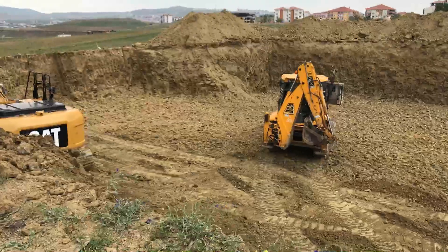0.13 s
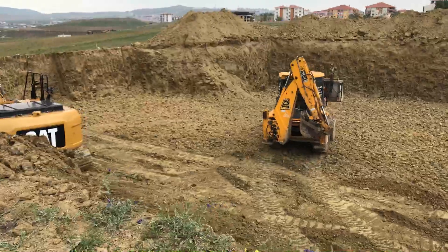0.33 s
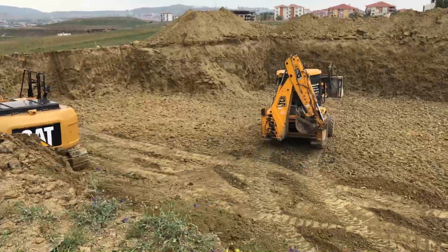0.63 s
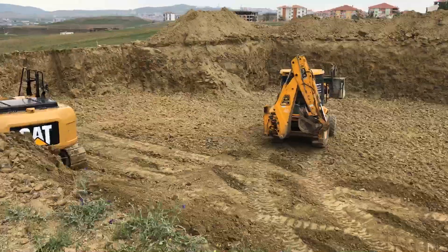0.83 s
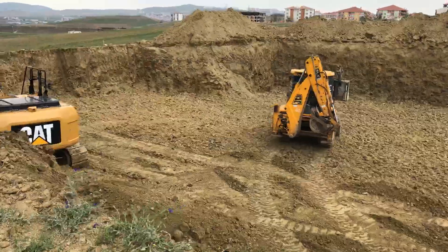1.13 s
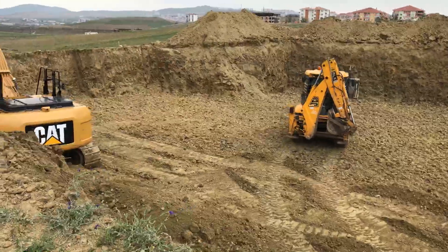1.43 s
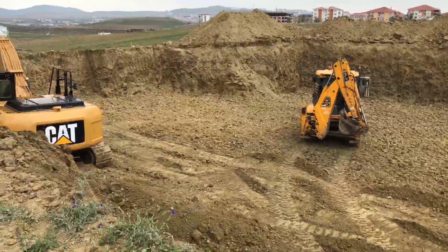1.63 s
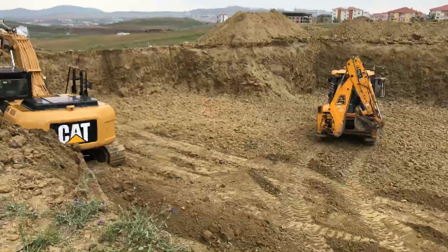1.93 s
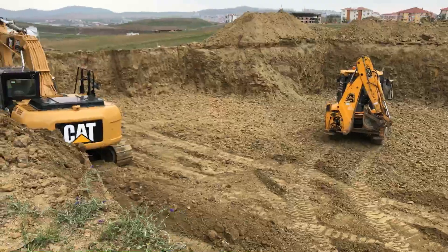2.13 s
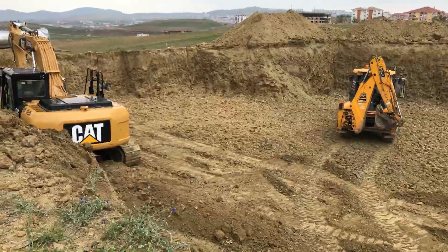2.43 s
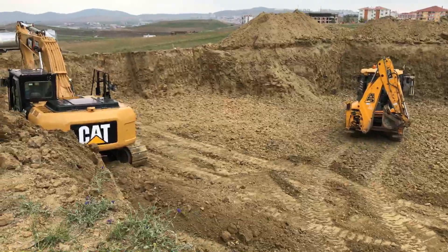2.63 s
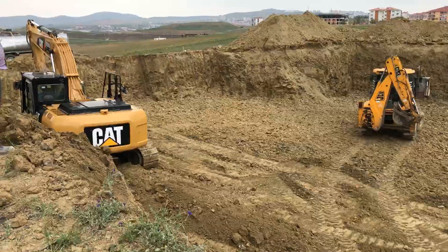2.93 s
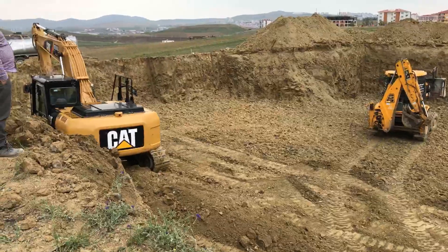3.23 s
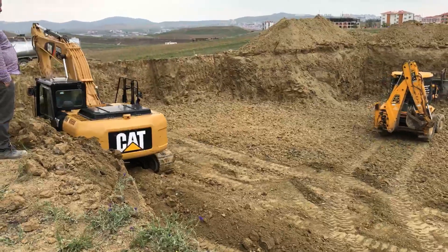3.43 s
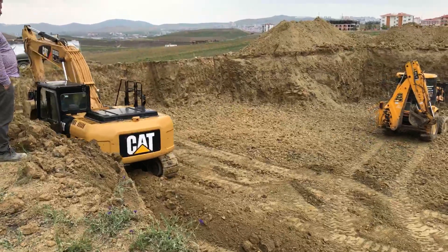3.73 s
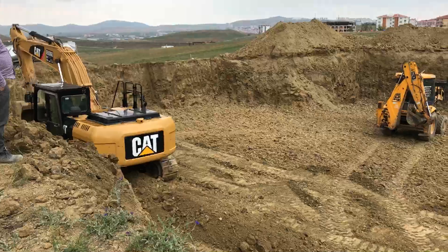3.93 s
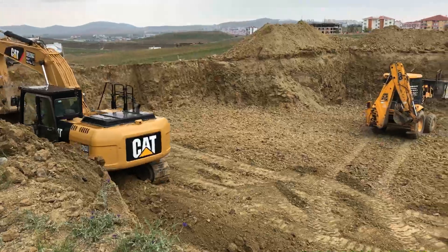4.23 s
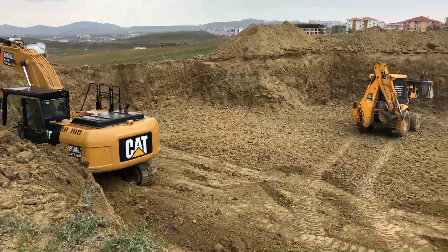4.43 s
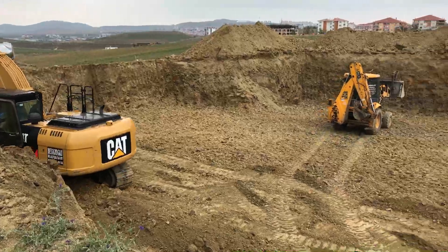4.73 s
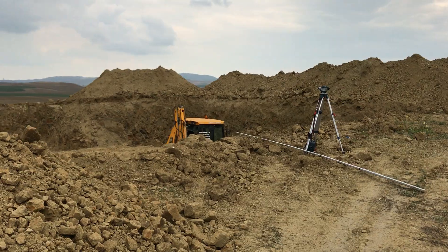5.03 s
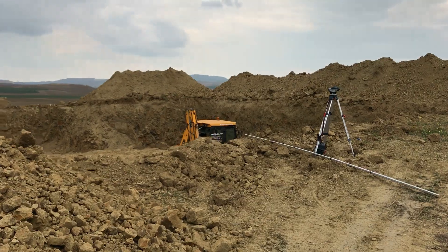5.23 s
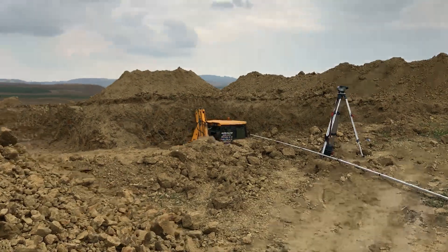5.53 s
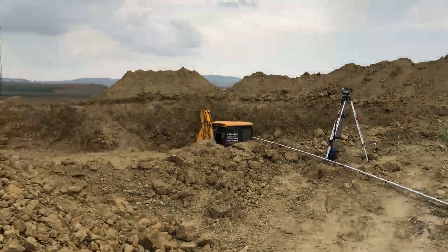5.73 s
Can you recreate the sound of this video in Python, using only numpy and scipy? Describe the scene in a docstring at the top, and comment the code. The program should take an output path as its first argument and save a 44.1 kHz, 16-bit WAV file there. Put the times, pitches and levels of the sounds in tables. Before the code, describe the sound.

From the start, a loader's diesel drones low and slightly unevenly, with rough knocking and a very faint, high wavering turbo whistle. A tracked excavator crawls over dirt: gritty grinding, hollow low booms, short dry squeaks and faint hydraulic hiss. Steel clanks and scrapes come irregularly, with a sharp one near 0.8 s and scattered single knocks through 1 to 2.3 s. The engine sags and its drone swells around 2 to 2.7 s. The densest, loudest clatter falls at about 2.8 to 3.2 s, followed by more blows near 3.4 and 3.8 s and crunching scrapes until 5 s. Soft wind gusts nudge the outdoor microphone. At about 5.05 s the sound stops abruptly; silence lasts until 5.6 s. Then the site returns from further back: muffled drone, dull noise, quick low bumps near 5.6 and 5.85 s, and a faint clatter around 5.7 s.

```python
"""The diesel of a backhoe loader pushing soil in a pit drones in firing orders, knocks as gated noise and
whistles from its turbo. A tracked excavator crawls below the rim: bursts of contacts, coloured by the steel,
clank and scrape; grains grind, pins squeak in noisy modes, hulls boom, a valve hisses, and wind turbulence
nudges the microphone. After half a second of silence the site is heard from further back, hidden by the rim:
a shaded drone over a dull noise bed, one distant clatter and soft low bumps."""
import sys
import numpy as np
from scipy import signal
from scipy.fft import rfft, irfft
from scipy.io import wavfile
from scipy.ndimage import uniform_filter1d, map_coordinates

SR = 44100
rng = np.random.default_rng(int(sys.argv[2]) if len(sys.argv) > 2 else 0)


def bounce(signal):
    """Save signal as a 16-bit WAV file at the path given by the first command-line argument."""
    frames = np.transpose(np.atleast_2d(signal))
    limited = np.clip(frames, -1, 1)
    pcm = np.round(limited * 32767).astype(np.int16)
    wavfile.write(sys.argv[1], SR, pcm)


N = 258867
T = np.arange(N) / SR
HZ = np.fft.rfftfreq(N, 1 / SR)

# Spectra give only a shape: their sounds are scaled to rms 1 before a level is set.
# spectrum of wind turbulence: frequency_hz, density_db (per Hz)
WIND_SPECTRUM = [(15, -44), (28, -17), (45, 3), (62, 4.5), (85, 3), (130, -8), (250, -31), (600, -58.5)]
# gusts on the microphone: peak_s, level_db, half_length_s
WIND_GUSTS = [(0.514, -30.5, 0.047), (0.657, -38.5, 0.034), (1.032, -39, .025), (1.54, -32, 0.015),
              (1.98, -25.5, 0.038), (2.393, -33, 0.14), (3.046, -31.5, 0.098), (3.28, -25, 0.068),
              (3.6, -32.5, 0.089), (3.9, -27, 0.088), (4.136, -28, 0.031), (4.395, -34, 0.055),
              (4.654, -32, 0.058), (5.8, -29.5, 0.048)]
# spectrum behind the rim: frequency_hz, density_db (per Hz)
FAR_SPECTRUM = [(50, -23), (100, -10.5), (165, -2.5), (230, -17), (400, -19.5), (800, -20.5), (1500, -26.5),
                (3000, -33.5), (6000, -38.5), (9000, -48), (12500, -47), (15500, -64)]
# soft low bumps: peak_s, level_db, pitch_hz, half_length_s
SOFT_BUMPS = [(5.608, -23.5, 80, 0.015), (5.639, -12, 96, 0.0033), (5.636, -19, 224, 0.0022),
              (5.854, -21.5, 142, 0.0061)]
# brief narrow tones: steel parts, and at 2.46 s the engine's ninth firing order:
# peak_s, pitch_hz, level_db, half_length_s
BRIEF_TONES = [(0.01, 765, -31, 0.018), (0.947, 767, -33.5, 0.028), (1.056, 775, -36, 0.018),
               (2.46, 717, -42, 0.15), (4.504, 4490, -45, 0.018), (4.495, 5320, -44, .008),
               (5.772, 2040, -40.5, 0.0035)]
# hydraulic valve openings: start_s, length_s, level_db
OPENINGS = [(-.1, 0.54, -56), (.88, .22, -57), (1.65, 0.426, -55), (2.497, 0.37, -53.5)]
# squeaks of dry track pins: start_s, level_db, length_s (four times the time to the peak)
PIN_SQUEAKS = [(0, -38.5, .13), (.36, -49, .1), (0.68, -43, .14), (1.33, -52, .07), (2.1, -42, .09),
               (2.61, -57.5, .06), (3.164, -54, .06), (3.55, -43.5, .09), (4.54, -51, .1),
               (4.986, -49, .07)]
# modes of a squeaking pin: frequency_hz, width_hz, level_db
PIN_MODES = [(4500, 140, -14.5), (8830, 1400, -8), (12010, 180, -3.5), (13070, 200, -17)]
# spectrum of the booming hulls: frequency_hz, density_db (per Hz)
HULL_SPECTRUM = [(50, -24), (100, -10.5), (140, 2.5), (190, 0.5), (260, 2), (345, -3), (410, -12.5),
                 (600, -44), (1500, -49.5)]
# boom of the hulls with the crawling: time_s, level_db
HULL_LEVEL = [(0, -34.5), (.75, -35), (1.5, -38), (2.3, -38.5), (2.9, -33), (3.5, -35), (4.3, -37),
              (4.75, -34.5), (5.05, -36.5)]
# spectrum of crushed soil: frequency_hz, density_db (per Hz)
SOIL_SPECTRUM = [(250, -33), (440, -7), (570, 8), (730, 8), (950, -3), (1300, 1.5), (1650, -1.5),
                 (2100, -9), (3500, -12.5), (8000, -56)]
# soil grinding under the tracks: time_s, level_db
SOIL_LEVEL = [(0, -42.5), (.75, -44.5), (1.15, -45), (2.5, -45), (2.8, -37.5), (3.6, -37), (4.15, -37.5),
              (4.6, -35), (5.05, -39)]
# spectrum of rubbing grit: frequency_hz, density_db (per Hz)
GRIT_SPECTRUM = [(700, -24), (1600, -4), (2300, -1.5), (3200, 0), (4100, -4.5), (4500, -2.5), (5000, -10),
                 (6500, -12.5), (7800, -15.5), (9000, -13), (10400, -19), (11800, -17.5), (13500, -21.5),
                 (16000, -25)]
# gritty hiss along the shoes: time_s, level_db (before GRIT_TRIM_DB)
GRIT_LEVEL = [(0, -41), (.5, -44.5), (1.35, -42.5), (2.45, -47), (2.95, -41), (3.9, -45.5), (4.4, -43),
              (5.05, -42)]
# spectrum of the undercarriage steel: frequency_hz, density_db (per Hz)
STEEL_SPECTRUM = [(100, -10), (280, 9.5), (430, 10.5), (700, 10.5), (950, 7), (1450, 4), (1950, -1.5),
                  (3200, -3.5), (4500, -10), (6500, -12), (8500, -16), (10500, -20.5), (12000, -18.5),
                  (16000, -28)]
# resonances and dips of the track shoes: frequency_hz, width_hz, gain_db (negative for a dip)
SHOE_PEAKS_AND_DIPS = [(744, 26, 3), (2370, 23, -0.5), (3390, 53, -0.5), (4490, 100, 9.5), (4800, 35, -7.5),
                       (5240, 50, 5.5), (8280, 60, 3), (8200, 70, 6.5), (9390, 60, 3), (9130, 68, 13)]
# track clanks: start_s, level_db, centre_hz, t60_s
TRACK_CLANKS = [(0.073, -28, 2400, .15), (0.452, -27.5, 1180, .12), (0.587, -36, 900, 0.45),
                (0.79, -22.5, 1470, 0.089), (1.032, -33, 1830, 0.14), (1.276, -28.5, 1500, .17),
                (1.691, -26.5, 1500, .12), (2.197, -36, 1200, .1), (2.292, -32, 1200, .1),
                (2.582, -29, 1220, .14), (2.759, -26, 1583, .12), (2.819, -31, 1092, 0.47),
                (2.997, -24.5, 1025, 0.14), (3.009, -20, 1103, 0.15), (3.042, -27, 800, .2),
                (3.062, -20.5, 4150, .08), (3.107, -32.5, 1100, .1), (3.418, -23, 1680, 0.14),
                (3.488, -26.5, 1505, .15), (3.779, -28, 1685, .1), (4.494, -35, 6020, .07),
                (4.632, -37, 1100, .1), (4.79, -29, 2210, 0.15), (4.931, -33, 1300, .2)]
# tracks scraping over stones: peak_s, level_db, centre_hz, half_length_s
TRACK_SCRAPES = [(-0.013, -29.5, 3400, 0.059), (0.663, -36, 1500, 0.059), (0.705, -27.5, 4500, 0.018),
                 (0.77, -32, 3220, 0.032), (0.949, -36, 2800, 0.011), (3.065, -31, 1208, 0.031),
                 (3.229, -29, 1244, 0.023), (3.55, -39, 3700, 0.064), (3.846, -34, 3220, 0.041),
                 (4.557, -32.5, 2460, 0.037), (4.678, -33.5, 2740, 0.035), (4.83, -34.5, 2300, 0.028)]
# turbocharger whistle, before jitter: time_s, pitch_hz
TURBO_PITCH = [(0, 12500), (1.2, 12200), (1.7, 11940), (2.05, 11800), (2.35, 12400), (2.65, 13000),
               (3, 12620), (3.5, 12500), (4.2, 12370), (5.05, 11950)]
# spectrum of combustion knock: frequency_hz, density_db (per Hz)
KNOCK_SPECTRUM = [(300, -6.5), (700, 3), (1000, 1.5), (1400, -2.5), (2100, -8.5), (3100, -24.5),
                  (5100, -13.5), (6000, -11.5), (7500, -19), (10400, -33), (11400, -19), (12500, -22),
                  (14000, -30.5), (16000, -32)]
# loader engine, before small speed changes: time_s, firing_rate_hz
FIRING_RATE = [(0, 82), (.2, 83), (.45, 88.5), (1, 85.5), (1.4, 85), (2.05, 78.3), (2.45, 79.7),
               (2.75, 83.5), (3.1, 85.5), (3.4, 84.5), (3.7, 87.5), (4.1, 88.5), (4.45, 93), (4.85, 81),
               (5.05, 80)]
# exhaust orders: multiple of the firing rate, level_db (on the drone level or the overtone level)
EXHAUST_ORDERS = [(1, 0), (2, -7), (2.5, -16), (3, -12), (3.5, -20), (4, -11.5)]
# exhaust line at the firing rate: time_s, level_db
DRONE_LEVEL = [(0, -34.5), (.45, -37.5), (1.4, -35), (2.3, -29.5), (2.65, -26.5), (3, -35.5), (4.1, -30.5),
               (4.5, -35), (5, -28), (5.87, -31)]

SILENCE_START_S, SILENCE_END_S, FADE_S = 5.052, 5.605, .002
BREEZE_DB, BREEZE_SWING_DB = -41.5, 4
VALVE_LEAK_DB, VALVE_RAMP_S = -63, 0.06
HULL_KICK_DB, HULL_DB_PER_OCTAVE = -6, -11.5  # relative to a clank centred on 1 kHz
GRIT_TRIM_DB = -1.0
# overtones swell as load drags the engine below its free firing rate
FREE_HZ, OVERTONES_DB, LUG_DB_PER_HZ = 85, -32.5, .8
TURBO_DB = -61
EDGE_HZ = 15800


def amp(db):
    """Logarithmic level: decibels to amplitude gain."""
    return 10 ** (np.asarray(db) / 20)


def evened(x):
    """Power normalization: scales to rms 1."""
    return x / np.sqrt(np.mean(x ** 2) + 1e-20)


def curve(rows):
    """Linear interpolation: a two-column time table at every sample."""
    s, values = np.transpose(rows)
    return np.interp(T, s, values)


def colour(x, points, extra_db=0):
    """Spectral shaping: weights the spectrum of x along log frequency, at rms 1."""
    hz, db = np.transpose(points)
    shape_db = np.interp(np.log(HZ + 1), np.log(hz), db)
    return evened(irfft(rfft(x) * amp(shape_db + extra_db), N))


def noise_band(hz, width):
    """Resonance: noise through a bell of the given full width at half amplitude, at rms 1."""
    bell = 1 / (1 + ((HZ - hz) / width * 2) ** 2)
    return evened(irfft(rfft(rng.standard_normal(N)) * bell, N))


def drift(hz):
    """Low-frequency random modulation: rms 1, mostly below hz."""
    lowpass = np.exp(-(HZ / hz) ** 2) * (HZ > 0)
    return evened(irfft(rfft(rng.standard_normal(N)) * lowpass, N))


def grains(per_s, spread_db):
    """Shot noise: random clicks, a few of them large, at rms 1."""
    size = amp(spread_db * np.minimum(rng.exponential(1, N), 4))
    hit = rng.random(N) < per_s / SR
    return evened(size * rng.standard_normal(N) * hit)


def swell(s, half):
    """Gaussian envelope: a smooth rise and fall around the time s."""
    return np.exp(-np.minimum(((T - s) / half) ** 2, 50) / 2)


def strike(s, t60, rise_s):
    """Exponential decay: a quick rise from the time s, while falling 60 dB per t60."""
    decay = amp(-60 * np.clip((T - s) / t60, 0, 3))
    return decay * np.clip((T - s) / rise_s, 0, 1)


def panel_ripple(depth_db=2.46, spacing_hz=45):
    """Modal density: many small panel modes and reflections ripple the spectrum, in dB."""
    heights = rng.standard_normal(2048)
    return depth_db * np.interp(HZ / spacing_hz, np.arange(len(heights)), heights)


def shoe_response():
    """Frequency response: the peaks and dips of the steel track shoes, in dB over frequency."""
    return sum(db / (1 + (2 * (HZ - hz) / width) ** 2) for hz, width, db in SHOE_PEAKS_AND_DIPS)


def wind():
    """Turbulence: low-frequency noise forms a restless breeze with gusts added in power."""
    eddies = colour(rng.standard_normal(N), WIND_SPECTRUM)
    # even out the slow loudness so that the envelope sets it
    eddies /= np.sqrt(uniform_filter1d(eddies ** 2, size=3000) + .05)
    breeze = amp(BREEZE_DB + BREEZE_SWING_DB * drift(27))
    gust_power = sum((amp(db) * swell(s, half)) ** 2 for s, db, half in WIND_GUSTS)
    return np.sqrt(breeze ** 2 + gust_power) * eddies


def behind_rim(firings, bed_db=-38, clatter_db=-39.5, clatter_s=5.73, half_s=0.033):
    """Diffraction: the drone bends over the rim, the treble is shaded; a clatter and bumps join it."""
    bed = amp(bed_db) * colour(rng.standard_normal(N), FAR_SPECTRUM, panel_ripple())
    treble_loss_db = -4 * np.log2(1 + HZ / 700)
    clatter = colour(grains(3000, 1.6), STEEL_SPECTRUM, treble_loss_db)
    out = exhaust(firings, shade_db=-9) + bed
    out += amp(clatter_db) * swell(clatter_s, half_s) * clatter
    for s, db, hz, half in SOFT_BUMPS:
        out += amp(db) * swell(s, half) * np.cos(2 * np.pi * hz * (T - s))
    return out


def brief_tones():
    """Resonance: each brief tone is slightly unsteady."""
    wobble_rad = .5 * drift(70)
    return sum(amp(db) * swell(s, half) * np.sin(2 * np.pi * hz * T + wobble_rad)
               for s, hz, db, half in BRIEF_TONES)


def valve(hz=6100, width_hz=1150, flutter_db=4.1):
    """Jet noise: throttled hydraulic oil hisses in one band, louder while the valve is open."""
    flow = np.zeros(N)
    for s, length, db in OPENINGS:
        flow += amp(db) * np.clip(np.minimum(T - s, s + length - T) / VALVE_RAMP_S, 0, 1)
    return np.hypot(amp(VALVE_LEAK_DB), flow) * amp(flutter_db * drift(25)) * noise_band(hz, width_hz)


def pins():
    """Stick-slip friction: a track pin sounds in a few high modes, here bands of noise."""
    envelope = np.zeros(N)
    for s, db, length in PIN_SQUEAKS:
        u = np.maximum(T - s, 0) / length * 4
        envelope += amp(db) * u * np.exp(1 - u)
    return envelope * sum(amp(db) * noise_band(hz, width) for hz, width, db in PIN_MODES)


def hulls(t60=0.3, rise_s=0.017):
    """Cavity boom: hollow bodies sound with the crawling, and clanks kick them, more the lower they sound."""
    kick_power = np.zeros(N)
    for s, db, hz, _ in TRACK_CLANKS:
        kick_db = db + HULL_KICK_DB + HULL_DB_PER_OCTAVE * np.log2(hz / 1000)
        kick_power += (amp(kick_db) * strike(s, t60, rise_s)) ** 2
    crawl = amp(curve(HULL_LEVEL) + drift(6.6))
    return np.sqrt(crawl ** 2 + kick_power) * colour(grains(4000, 0.69), HULL_SPECTRUM)


def running_gear():
    """Granular contact: soil is crushed and grit rubs along the shoes, over the booming hulls."""
    soil_gain = amp(curve(SOIL_LEVEL) + 0.61 * drift(30))
    soil = soil_gain * colour(grains(9000, 2.8), SOIL_SPECTRUM, panel_ripple())
    grit_gain = amp(curve(GRIT_LEVEL) + GRIT_TRIM_DB + 0.81 * drift(30))
    grit_body_db = 0.15 * shoe_response() + panel_ripple()
    grit = grit_gain * colour(grains(20000, 1.4), GRIT_SPECTRUM, grit_body_db)
    return hulls() + soil + grit


def track_blows(hump_db=18, hump_octaves=1.32, rise_s=0.0037, wall_db=-13, wall_s=.06):
    """Impact and reflection: bursts of contacts on the same steel, returned by the pit wall."""
    blows = [(amp(db) * strike(s, t60, rise_s), hz) for s, db, hz, t60 in TRACK_CLANKS]
    blows += [(amp(db) * swell(s, half), hz) for s, db, hz, half in TRACK_SCRAPES]
    centres = np.geomspace(750, 6000, 6)
    body_db = shoe_response() + panel_ripple()
    out = np.zeros(N)
    for centre, pick in zip(centres, np.eye(len(centres))):
        # small, hard contacts sound higher: a blow shares its power between the two nearest centres
        power = sum(np.interp(np.log(hz), np.log(centres), pick) * envelope ** 2
                    for envelope, hz in blows)
        octaves = np.log2((HZ + 1) / centre)
        hump = hump_db * np.exp(-(octaves / hump_octaves) ** 2 / 2)
        out += np.sqrt(power) * colour(grains(12000, 1.7), STEEL_SPECTRUM, body_db + hump)
    dulled = signal.lfilter([.3], [1, -.7], out)
    return out + amp(wall_db) * np.interp(T - wall_s, T, dulled, left=0)


def shifting(x, patchy_db=1.5, patch_hz=300, patch_s=.06):
    """Moving excitation: contacts travel along the track, so the colour shifts in small patches."""
    hz, t, z = signal.stft(x, SR, nperseg=512)
    field = rng.standard_normal((512, 512))
    at = np.meshgrid(hz / patch_hz, t / patch_s, indexing="ij")
    patches = evened(map_coordinates(field, at, order=1, mode="wrap"))
    return signal.istft(z * amp(patchy_db * patches), SR, nperseg=512)[1][:N]


def turbo(flutter_db=5.5, jitter_hz=90):
    """Frequency modulation: a thin whistle with a gliding, jittering pitch and a fluttering level."""
    hz = curve(TURBO_PITCH) + jitter_hz * drift(150)
    phase = 2 * np.pi * np.cumsum(hz) / SR
    return amp(TURBO_DB + flutter_db * drift(18)) * np.sin(phase)


def crank_firings():
    """Phase accumulation: the count of firings so far, at a never quite even speed."""
    return np.cumsum(curve(FIRING_RATE) * (1 + 0.0058 * drift(11.8))) / SR


def diesel_knock(firings, knock_db=-42, uneven=0.099):
    """Impulsive combustion: each firing rattles the block; the four cylinders differ."""
    pulse = 2.2 + np.exp(-(firings % 1) / 0.69)
    gate = pulse * (1 + uneven * np.cos(np.pi * firings / 2))  # repeats every four firings
    return amp(knock_db + drift(23)) * colour(gate * rng.standard_normal(N), KNOCK_SPECTRUM)


def exhaust(firings, shade_db=0, waver_db=1.0):
    """Harmonic orders of the firing rate: overtones grow under load and waver in the open air."""
    line_db = curve(DRONE_LEVEL)
    overtones_db = OVERTONES_DB + shade_db + LUG_DB_PER_HZ * (FREE_HZ - curve(FIRING_RATE))
    out = np.zeros(N)
    for order, db in EXHAUST_ORDERS:
        level_db = line_db if order == 1 else overtones_db + waver_db * drift(4)
        out += amp(level_db + db) * np.cos(2 * np.pi * (order * firings + rng.random()))
    return out


def scene():
    """Superposition: the sources in the pit, then silence, then the spot behind the rim."""
    firings = crank_firings()
    engine = exhaust(firings) + diesel_knock(firings) + turbo()
    pit = engine + shifting(valve() + running_gear() + track_blows()) + pins()
    before = np.clip((SILENCE_START_S - T) / FADE_S, 0, 1)
    after = np.clip((T - SILENCE_END_S) / FADE_S, 0, 1)
    both = (before + after) * (wind() + brief_tones())
    return (before * pit + after * behind_rim(firings) + both)[None]


def record(dry):
    """Band limitation: a linear-phase low-pass removes what lies above EDGE_HZ."""
    lowpass = signal.firwin(511, EDGE_HZ, window=("kaiser", 9), fs=SR)
    return signal.oaconvolve(dry, lowpass[None], "same")


dry = scene()
out = record(dry)
bounce(out)
```